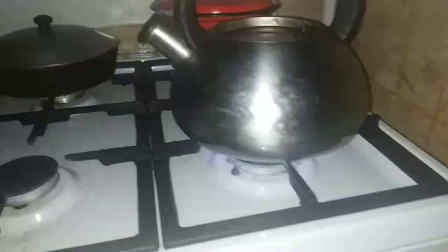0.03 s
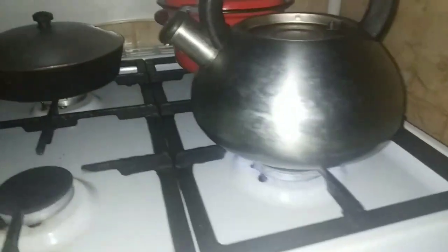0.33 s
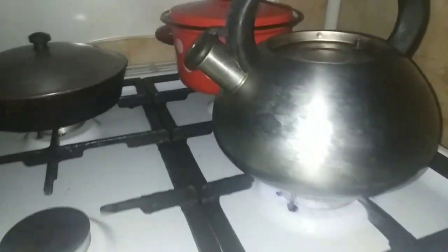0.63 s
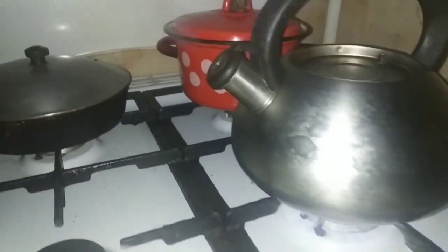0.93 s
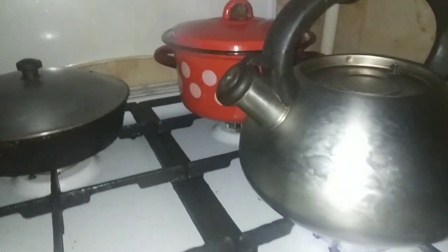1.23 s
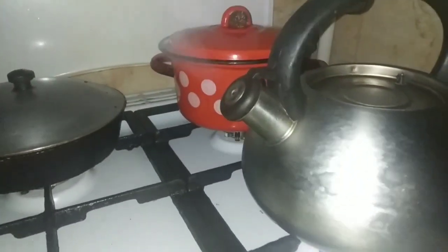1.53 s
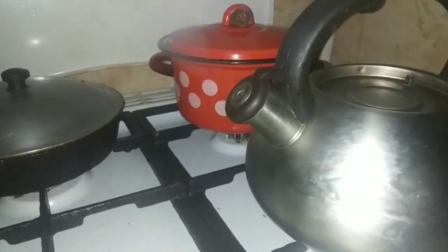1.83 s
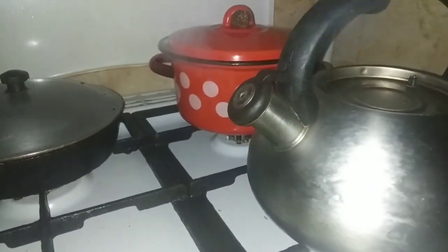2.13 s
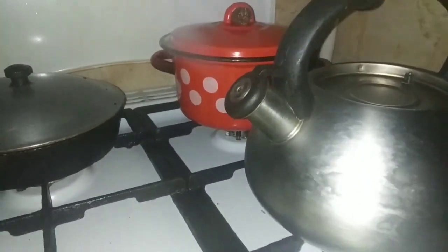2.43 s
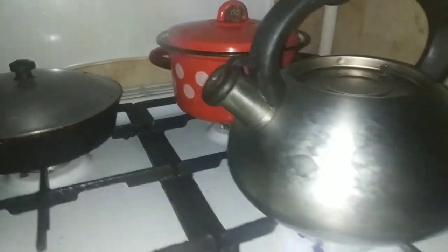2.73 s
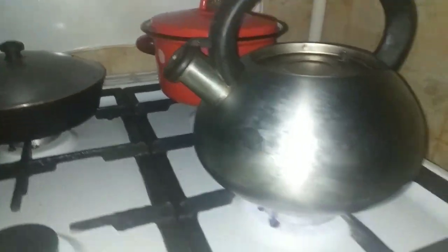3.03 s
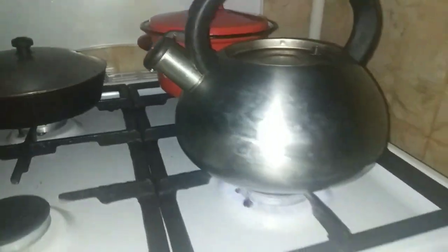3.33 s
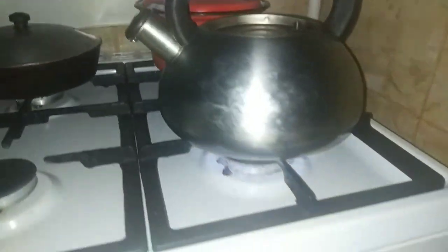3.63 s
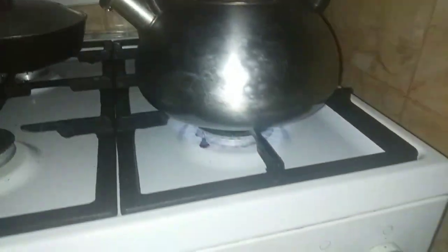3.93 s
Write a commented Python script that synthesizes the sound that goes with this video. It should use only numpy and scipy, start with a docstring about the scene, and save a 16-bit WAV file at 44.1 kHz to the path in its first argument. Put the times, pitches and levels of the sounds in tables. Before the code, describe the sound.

Breathy, high kettle whistle climbs slowly in pitch, with steam hiss and a faint gas flame.

```python
"""A steel kettle whistles on a gas stove, miked close in stereo in a small kitchen. Steam through the
spout cap drives four strong resonances and two faint ones over a hiss: breathy and shrill, rising
slowly with the pressure and growing hoarser. The burner murmurs below, with a low hum and one dull
knock. The sound fades in, and the microphone moves closer and away again."""
import sys
import numpy as np
from scipy import signal
from scipy.fft import rfft, irfft, next_fast_len
from scipy.io import wavfile
from scipy.ndimage import map_coordinates

SR = 44100
rng = np.random.default_rng(int(sys.argv[2]) if len(sys.argv) > 2 else 0)


def output_pcm(signal):
    """Save a mono or channel-first signal as 16-bit PCM at the path in sys.argv[1].

    Samples are clipped to [-1, 1] before scaling.
    """
    pcm = np.clip(np.atleast_2d(signal).T, -1, 1) * 32767
    wavfile.write(sys.argv[1], SR, np.round(pcm).astype(np.int16))


N = 176400

# the whistle's main note: t/s, f/Hz
WHISTLE_PITCH = [(.1, 3690), (.35, 3836), (.5, 3790), (.65, 3845), (.85, 3945), (1.0, 3950), (1.2, 3998),
                 (1.65, 4010), (2, 4085), (2.45, 4090), (2.55, 4128), (2.64, 4085), (3, 4205), (3.3, 4232),
                 (3.55, 4280), (3.8, 4270), (4, 4235)]
# its clean tone over its breathy part: t/s, ratio/dB
WHISTLE_PURITY = [(.1, -1), (.4, 6), (.9, 2.5), (1.4, 7), (2.3, 4), (2.7, 1), (3.1, 4), (3.5, 0), (4, -1)]
# cap resonances: f/main note, core width/Hz, skirt width/Hz, skirt/dB, gain/dB, flutter/dB, start/dB
CAP_MODES = [(.52, 86, 140, 4, -2.37, 1.5, -15), (1.0, 43, 134, 6.5, -.5, 1.18, -8),
             (1.497, 69, 188.4, 5.5, -2, 1.96, -15.5), (2.0, 64.3, 152, 4, -0.5, 0, -6),
             (2.485, 201, 259, -18, -16, 1.44, -6), (3.01, 130, 220, 8, -16.5, 1, -10)]
# their level curves, low to high, the top three sharing the last: t/s, 4 x level/dB
MODE_LEVELS = [(0.35, -41, -30, -30, -39), (0.45, -40, -30, -31, -37), (0.6, -39, -32, -31, -39),
               (0.73, -38, -30, -29, -38), (0.87, -41, -34, -33, -34), (1.0, -37, -33, -31, -34),
               (1.2, -37, -31, -31, -33), (1.45, -37, -27, -31.5, -31), (1.73, -35, -28, -29, -31),
               (1.84, -35, -30, -29, -31), (1.95, -32, -29, -28, -30), (2.08, -35, -31, -30, -31),
               (2.19, -31, -31, -27, -31), (2.35, -33, -30, -28, -30), (2.62, -34, -30, -28, -27),
               (2.72, -35, -31, -29, -29), (2.84, -35, -31, -25, -28), (2.97, -39, -27, -28, -27),
               (3.1, -36, -28, -28, -30), (3.22, -39, -29, -33, -31), (3.3, -36, -31, -29, -30),
               (3.45, -37, -32, -30, -31), (3.56, -37, -30, -32, -31), (3.65, -35, -32, -29, -31),
               (3.77, -40, -29, -34, -30), (3.95, -37, -30, -31, -33)]
# their lean as the microphone moves through standing waves: t/s, 4 x left minus right/dB
MODE_PANS = [(.4, .5, 2, -4, -1), (.7, .5, -2.5, 0, 1.5), (1.1, .5, -1, 2.5, 1), (1.65, 2, 2, -3, 2),
             (2.3, 3.5, -2.5, -3.5, -4), (2.7, 1, -1.5, .5, .5), (3.1, -10, 2, -1, -.5),
             (3.9, -6, 2.5, 1.5, -1)]
# spurts of steam: centre t/s, length/s, f/Hz, tone level/dB, rasp level/dB
STEAM_SPURTS = [(.44, .34, 1900, -40, -46), (.41, .13, 5790, -31, -42), (1.48, .4, 6012, -31.5, -55),
                (1.74, .1, 6019, -27.5, -48), (2.19, .07, 2190, -32, -38), (2.97, .12, 4205, -40, -34),
                (3.288, .05, 2240, -30.5, -29.5), (3.64, .07, 2290, -28, -33), (3.98, .056, 2280, -35, -43)]
# hiss and rasp of the jet at the whistle's mean pitch: f/Hz, relative density/dB
HISS_COLOUR = [(300, -12.5), (1100, -4), (1400, 5), (1650, 0.5), (2050, 13), (2320, 6), (2550, -10.5),
               (2850, 0.5), (3250, -4), (3600, 11), (4000, -12), (4300, 8), (4780, -10.5), (5300, -6),
               (6400, 11.5), (6950, -6.5), (7400, 2), (8100, 6.5), (8850, -16), (9500, -13.5), (10100, 4.5),
               (10700, -6.5), (11400, 1), (12500, 3.5), (14000, 1), (14900, 4.5), (16500, -3.5)]
RASP_COLOUR = [(4700, -25.5), (5100, 7), (5550, 1), (5850, 12.5), (6350, -0.5), (6900, -22.5)]
# their strength: t/s, level/dB
HISS_LEVEL = [(.3, -37.5), (1.2, -34.5), (2.2, -34), (2.7, -34.5), (3, -37), (3.4, -36.5), (4, -38)]
RASP_LEVEL = [(.1, -44), (.35, -58), (.8, -38), (1.4, -40.5), (2.1, -37), (2.6, -41.5), (2.849, -40),
              (2.97, -40), (3.149, -36), (3.5, -39), (4, -40)]
# roar of the flame: f/Hz, relative density/dB
FLAME_COLOUR = [(15, -40), (30, 5.5), (48, 0.5), (90, 1), (115, 0.5), (140, -20), (175, -14), (228, -3),
                (260, -6), (330, -4.5), (420, -7.5), (520, -11.5), (720, -12.5), (900, -8), (1100, -22.5),
                (1500, -23)]
# its likeness left and right: f/Hz, correlation
FLAME_COHERENCE = [(60, 0.87), (150, 0.74), (300, 0.74), (700, 0.36)]
# the burner's hum: f/Hz, width/Hz, level over the flame/dB
HUM_PARTIALS = [(138.5, 12, -4.5), (228, 9.5, -14), (451, 3, -11.5)]
# strength of flame and hum: t/s, level/dB
BURNER_LEVEL = [(.3, -48), (.8, -47.5), (1.25, -50), (1.8, -47.5), (2.3, -48), (2.75, -48), (3.2, -49.5),
                (3.6, -47.5), (4, -50)]
# ring of the knock: f/Hz, relative level/dB, t60/s
KNOCK_MODES = [(486, -2, 0.44), (537, -0.5, 0.37), (704, -11, 0.74)]
# decay of the kitchen: f/Hz, t60/s
ROOM_DECAY = [(200, 0.36), (3000, 0.19), (12000, 0.2)]
# later arrival of the spout on the left: t/s, delay/ms
LEFT_LAG = [(.2, .155), (1, .11), (2.5, .11), (3, .16), (3.8, .195)]
# balance of the microphone ports: f/Hz, left minus right/dB
PORT_BALANCE = [(500, 1), (2000, 2.5), (4000, -1.5), (6000, -3), (8200, -2), (12000, -0.5), (15000, 5)]
# lead of the left port: f/Hz, phase/rad
PORT_PHASE = [(600, -0.054), (2050, -0.014), (2300, 0.96), (3700, -2.05), (4300, -1.28), (6000, -0.3),
              (8200, -0.3)]
# dip in the top treble: f/Hz, gain/dB
TREBLE_DIP = [(12600, 0), (13600, -11), (14300, 0)]

JITTER_HZ, JITTER_RATE = 12.03, 70  # unsteady pitch; every RATE is in random knots a second
SPUTTER_DB, SPUTTER_RATE, SURGE_DB, SURGE_RATE = 0.44, 120, 0.47, 20  # uneven steam flow
SCATTER_DB, DRIFT_RAD, DRIFT_RATE = -1.5, 0.42, 5.9  # scatter and tone phase differ left and right


def whistle(swell_s=0.29):
    """The jet rings the cap's resonances, which follow one pitch; the second locks into a tone."""
    pitch, = curves(WHISTLE_PITCH)
    phase = jittery_phase(pitch)
    purity = amp(curves(WHISTLE_PURITY)[0])
    levels, pans = curves(MODE_LEVELS), curves(MODE_PANS)
    drift = np.exp(1j * DRIFT_RAD * np.array([wobble(DRIFT_RATE), wobble(DRIFT_RATE)]))
    starting = np.clip(1 - np.arange(N) / SR / swell_s, 0, 1)
    out = np.zeros((2, N))
    for k, (ratio, core_hz, skirt_hz, skirt_db, db, flutter_db, start_db) in enumerate(CAP_MODES):
        core = resonance(turbulence(), core_hz)
        skirt = amp(skirt_db) * resonance(turbulence(), skirt_hz)
        ring = unit(core + skirt)
        if k == 1:
            ring = (ring + purity * drift) / np.sqrt(1 + purity ** 2)
        partial = unit(np.real(ring * np.exp(1j * ratio * phase)))
        column = min(k, len(levels) - 1)
        level_db = levels[column] + db + start_db * starting + flutter_db * wobble(SURGE_RATE)
        out += amp(level_db + left_right(pans[column])) * partial
    return out


def spurts():
    """In each spurt a resonance locks into a thin tone, with a puff of rasp under the same swell."""
    t = np.arange(N) / SR
    rasp = jet(RASP_COLOUR)
    out = np.zeros((2, N))
    for centre_s, length_s, hz, tone_db, rasp_db in STEAM_SPURTS:
        tone = unit(np.sin(jittery_phase(hz)))
        swell = np.exp(-(2 * (t - centre_s) / length_s) ** 2)
        out += swell * (amp(tone_db) * tone + amp(rasp_db) * rasp)
    return out


def jet(colour):
    """Steam noise of rms 1; its colour rises and falls with the whistle's pitch."""
    pitch, = curves(WHISTLE_PITCH)
    noise = filtered(shifting_colour(turbulence()), lambda hz: amp(along(colour, hz)))
    glide_s = np.cumsum(1 - pitch / pitch.mean()) / SR  # a shrinking delay raises the colour
    return unit(np.array([delayed(channel, glide_s) for channel in noise]))


def turbulence():
    """White noise: a part common to both channels and a part scattered by stove and tiles."""
    return rng.standard_normal(N) + amp(SCATTER_DB) * rng.standard_normal((2, N))


def kettle():
    """Whistle, spurts, hiss and rasp all flicker with the flow of steam."""
    steam = whistle() + spurts()
    steam += amp(curves(HISS_LEVEL)[0]) * jet(HISS_COLOUR)
    steam += amp(curves(RASP_LEVEL)[0]) * jet(RASP_COLOUR)
    return steam * amp(SPUTTER_DB * wobble(SPUTTER_RATE) + SURGE_DB * wobble(SURGE_RATE))


def burner():
    """The soft roar of the gas flame under the kettle, with a wavering low hum."""
    def mid_side(hz):
        angle = np.arccos(along(FLAME_COHERENCE, hz)) / 2
        return amp(along(FLAME_COLOUR, hz)) * [np.cos(angle), np.sin(angle)]

    mid, side = filtered(rng.standard_normal((2, N)), mid_side)
    flame = unit(np.array([mid + side, mid - side]))
    t = np.arange(N) / SR
    hum = np.zeros(N)
    for hz, width_hz, db in HUM_PARTIALS:
        waver = 1 + resonance(rng.standard_normal(N), width_hz)
        hum += amp(db) * unit(np.real(waver * np.exp(2j * np.pi * hz * t)))
    return amp(curves(BURNER_LEVEL)[0]) * (flame + hum)


def knock(at_s=0.499, gain_db=-43, attack_s=0.0038):
    """One faint, dull knock: three modes ring down after a soft attack."""
    t = np.maximum(np.arange(N) / SR - at_s, 0)
    ring = sum(amp(db - 60 * t / t60) * np.sin(2 * np.pi * hz * t) for hz, db, t60 in KNOCK_MODES)
    return amp(gain_db) * (1 - np.exp(-t / attack_s)) * ring


def kitchen(x, tail_db=-11):
    """The spout reaches the left port later; the small room adds a short tail."""
    lag_s = curves(LEFT_LAG)[0] / 1000
    direct = np.array([delayed(x[0], lag_s), x[1]])
    hz, t, noise = signal.stft(rng.standard_normal((2, SR // 2)), SR, nperseg=256)
    decay = amp(-60 * t / along(ROOM_DECAY, hz)[:, None])
    tail = signal.istft(noise * decay, SR, nperseg=256)[1]
    reverb = signal.fftconvolve(x, tail / np.linalg.norm(tail[0]), axes=1)[:, :N]
    return (direct + amp(tail_db) * reverb) / np.sqrt(1 + amp(tail_db) ** 2)


def shifting_colour(x, depth_db=2, patch_hz=220, patch_s=0.22):
    """Slow random patches of gain: the hiss shifts in colour as the microphone moves."""
    hz, t, spectrum = signal.stft(x, SR, nperseg=1024)
    grid = np.meshgrid(hz / patch_hz, t / patch_s, indexing="ij")
    patches = map_coordinates(rng.standard_normal((400, 200)), grid, mode="mirror")
    return signal.istft(spectrum * amp(depth_db * patches), SR, nperseg=1024)[1][:, :N]


def microphone(hz):
    """Response of the two ports: unequal in level and phase, with the same treble dip."""
    gain = amp(along(TREBLE_DIP, hz) + left_right(along(PORT_BALANCE, hz)))
    return gain * np.exp(1j * left_right(along(PORT_PHASE, hz)))


def resonance(noise, width_hz):
    """Random amplitude and phase of a noise-driven resonance of that width."""
    size = next_fast_len(N)
    hz = np.fft.fftfreq(size, 1 / SR)
    band = np.roll(np.fft.fft(noise, size), size // 4, axis=-1)  # mid-band noise moved to 0 Hz
    return unit(np.fft.ifft(band * np.exp(-np.abs(hz / width_hz)))[..., :N])


def jittery_phase(hz):
    """Running phase of a slightly unsteady pitch."""
    return 2 * np.pi * np.cumsum(hz + JITTER_HZ * wobble(JITTER_RATE)) / SR


def wobble(rate):
    """A smooth random curve, rate knots a second."""
    return map_coordinates(rng.standard_normal(N // 50), [np.arange(N) * rate / SR], mode="wrap")


def delayed(x, seconds):
    """x behind a moving delay."""
    fine = signal.resample_poly(x, 8, 1)
    fine_t = np.arange(len(fine)) / (8 * SR)
    return np.interp(np.arange(N) / SR - seconds, fine_t, fine, left=0)


def filtered(x, response):
    """x through a frequency response."""
    size = next_fast_len(N + SR // 4)
    return irfft(rfft(x, size) * response(np.fft.rfftfreq(size, 1 / SR)), size)[..., :N]


def curves(rows):
    """One value per sample for each column after the time."""
    times, *columns = np.transpose(rows)
    return [np.interp(np.arange(N) / SR, times, column) for column in columns]


def along(points, hz):
    """A table's value at hz, on a log frequency axis."""
    freqs, values = np.transpose(points)
    return np.interp(np.log(hz + 1), np.log(freqs + 1), values)


def left_right(difference):
    """Half added on the left, half taken off on the right."""
    return np.outer([.5, -.5], difference)


def amp(db):
    return 10 ** (np.asarray(db) / 20)


def unit(x):
    """x at rms 1."""
    return x / np.sqrt(np.mean(np.abs(x) ** 2) + 1e-20)


def scene():
    """Kettle, flame and knock at the microphone beside the stove."""
    return filtered(kitchen(kettle()) + burner() + knock(), microphone)


def record(dry):
    """A short fade-in and the band limit."""
    open_s, fade_s, top_hz = 0.068, 0.31, 15850
    fade = np.clip((np.arange(N) / SR - open_s) / fade_s, 0, 1) ** 0.61
    return filtered(dry * fade, lambda hz: hz < top_hz)


dry = scene()
out = record(dry)
output_pcm(out)
```